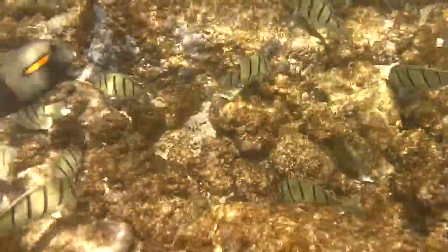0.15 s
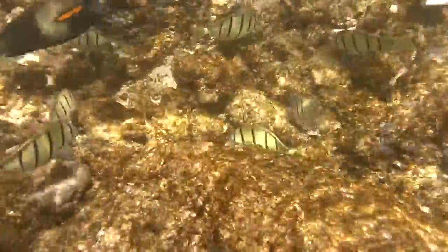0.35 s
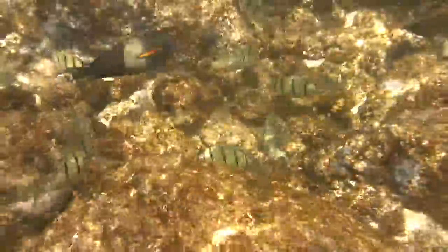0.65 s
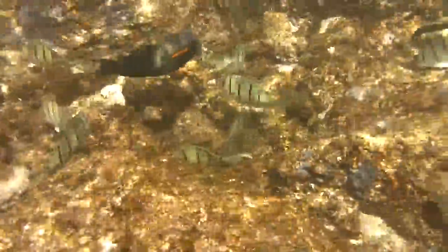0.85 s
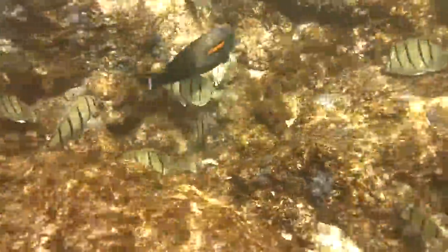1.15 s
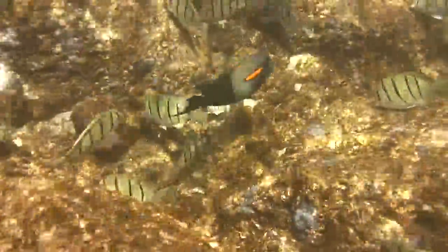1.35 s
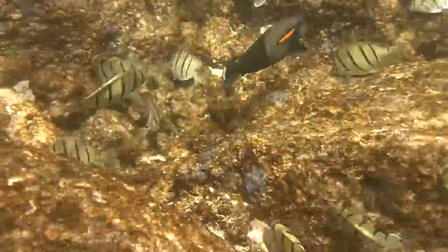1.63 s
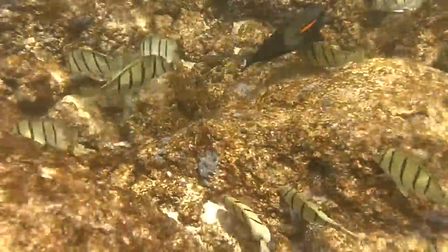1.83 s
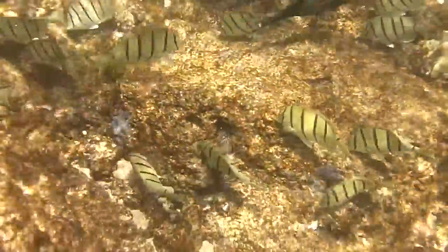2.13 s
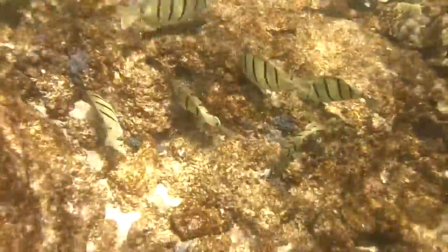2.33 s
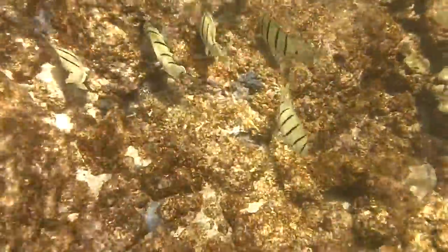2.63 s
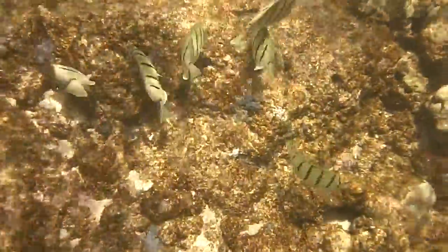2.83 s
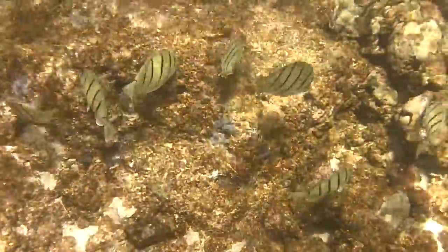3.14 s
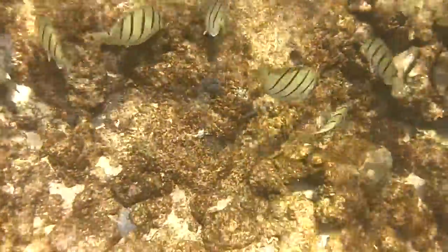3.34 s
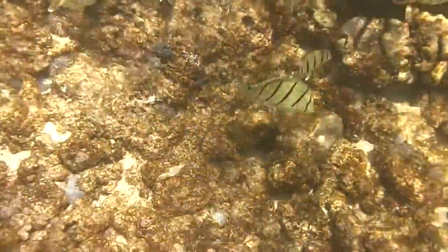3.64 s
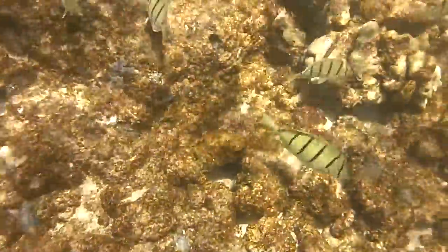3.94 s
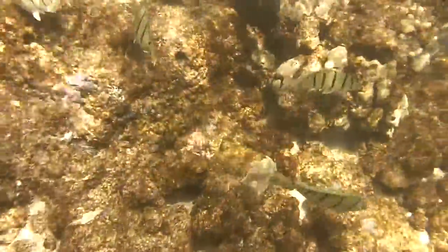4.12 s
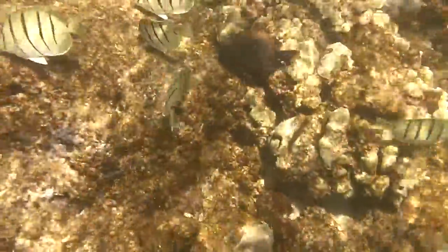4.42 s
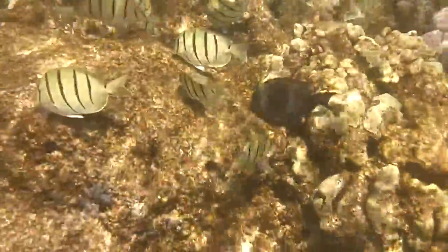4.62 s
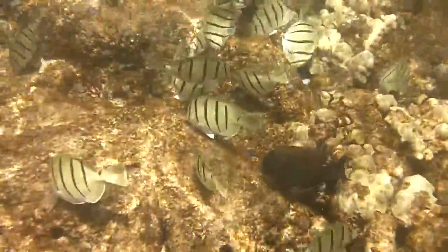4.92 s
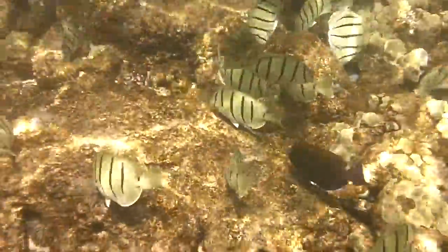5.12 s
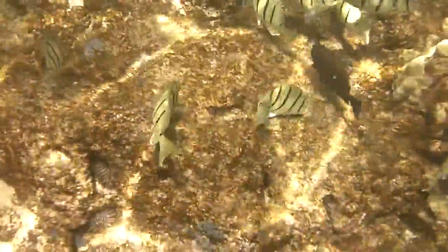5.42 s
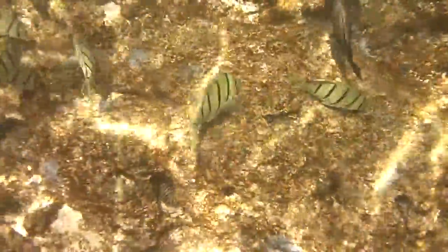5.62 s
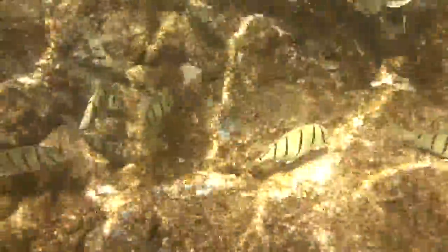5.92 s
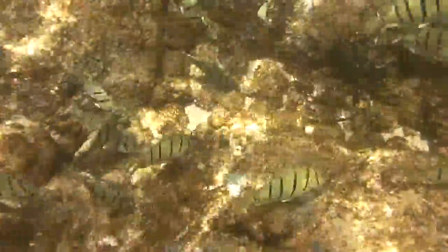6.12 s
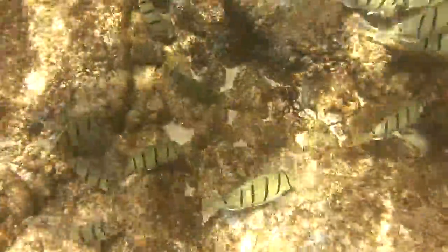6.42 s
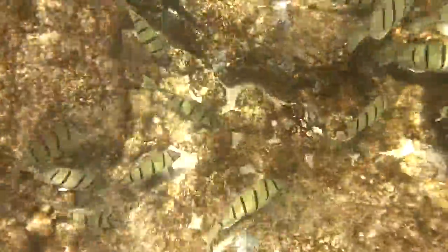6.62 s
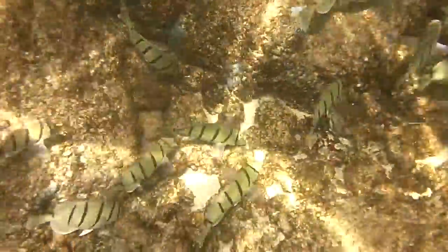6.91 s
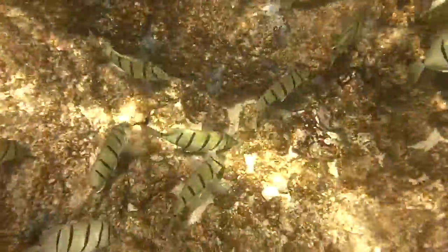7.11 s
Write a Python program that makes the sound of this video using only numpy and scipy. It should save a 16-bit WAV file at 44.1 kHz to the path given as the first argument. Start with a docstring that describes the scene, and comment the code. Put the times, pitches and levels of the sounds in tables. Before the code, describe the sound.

Underwater on a shallow reef beneath small breaking surf, with striped fish grazing silently. The sound is muffled and boxy, nearly mono, inside a sealed case. Low gurgling and a hollow trickle around one kilohertz run throughout, over deep slow swell and a faint fine shrimp crackle. From 0 to 2 s the water is lively: a broad low thump at 0.4-0.7, plopping bubbles, a cluster of bright bloops at 1.6, and small snaps. Dry stone clacks strike at 1.36 and 2.36. The surf eases around 2.4-2.9, then a dense bubbly rush churns up at 3.1 and fades by 3.4, with thumps. Afterwards softer trickling continues, with little blips around 4 and puffs of bubbles at 3.9 and 4.6. Low thumps come near 4.9-5.1 and most strongly at 5.9-6.1, with a sharp snap at 6.02. More bubbling follows at 6.3 and a low plop at 6.9, before gentle gurgling to the end near 7.3.

```python
"""A shallow reef under breaking surf, heard under water by two microphones in a sealed case.
Surf gurgles and trickles as swarms of decaying bubble resonances; near bubbles, puffs of air and
a folding wavelet add more. Shrimp snaps are decaying noise bursts, pebble clacks filtered impulses
with ringing case modes, and the swell and eddies low-frequency noise pressing on the case."""
import sys
import numpy as np
from scipy import signal
from scipy.fft import rfft, irfft, next_fast_len
from scipy.io import wavfile
from scipy.ndimage import uniform_filter1d, map_coordinates

SR = 44100
rng = np.random.default_rng(int(sys.argv[2]) if len(sys.argv) > 2 else 0)


def unload_audio(sound):
    """Save the sound as a 16-bit wav file, at the path given as the first command line argument."""
    columns = np.transpose(np.atleast_2d(sound))
    # keep every value between -1 and 1, then stretch to whole-number steps
    steps = np.round(np.clip(columns, -1, 1) * 32767)
    wavfile.write(sys.argv[1], SR, steps.astype(np.int16))


N = 320166

# strength of the surf, as the gurgle of its big bubbles before gain and flutter: t/s, level/dB
SURF_STRENGTH = [(0.0, -48), (0.28, -42), (0.55, -48.5), (0.78, -40), (1.07, -46), (1.29, -45.5),
                 (1.58, -40.5), (2.06, -45), (2.45, -53), (2.82, -56), (3.1, -43), (3.5, -44.5),
                 (3.95, -50.5), (4.35, -46), (5.1, -45), (5.9, -48.5), (6.45, -47.5), (7.26, -50)]
# spectrum of small bubbles inside the case: f/Hz, relative level/dB
TRICKLE_SPECTRUM = [(300, -65.5), (560, -25), (650, -13), (740, -13), (850, -4.5), (1030, 2.5), (1110, 0.5),
                    (1220, -4.5), (1370, -16), (1600, -18.5), (1900, -12.5), (2350, -12), (3300, -35),
                    (4500, -40), (9000, -88.5)]


def amp(db):
    """Decibels to amplitude ratio, 20 dB per factor of ten."""
    return 10 ** (np.asarray(db) / 20)


def unit(x):
    """Normalization of x to an rms of 1."""
    return x / np.sqrt(np.mean(x ** 2) + 1e-20)


def along(points, hz):
    """Linear interpolation of (f/Hz, value) points on a logarithmic frequency axis."""
    f, value = np.transpose(points)
    return np.interp(np.log(hz + 1), np.log(f + 1), value)


def curves(rows):
    """Linear interpolation in time: one value per sample for each column after t/s."""
    s, *columns = np.transpose(rows)
    return [np.interp(np.arange(N) / SR, s, column) for column in columns]


def wobble(rate):
    """Slow random modulation: a smooth spline through Gaussian knots, rate of them a second."""
    knots = rng.standard_normal(int(N * rate / SR) + 4)
    return map_coordinates(knots, [np.arange(N) * rate / SR])


def filtered(x, response):
    """Linear filtering: the spectrum of x times a complex response of frequency."""
    m = next_fast_len(N + SR // 2)
    return irfft(rfft(x, m) * response(np.fft.rfftfreq(m, 1 / SR)), m)[..., :N]


def coloured(x, level_db):
    """Minimum-phase filtering: level_db(Hz) sets the magnitude, the folded cepstrum the causal phase."""
    m = 2 * next_fast_len(len(x) // 2 + SR // 10)
    cepstrum = irfft(np.log(amp(level_db(np.fft.rfftfreq(m, 1 / SR)))))
    cepstrum[1:m // 2] *= 2
    cepstrum[m // 2 + 1:] = 0
    return irfft(rfft(x, m) * np.exp(rfft(cepstrum)), m)[:len(x)]


def through(x, spectrum):
    """Spectral shaping: x filtered by the spectrum's levels, at rms 1."""
    return unit(coloured(x, lambda hz: along(spectrum, hz)))


def add(track, s, sound):
    """Superposition: mix a sound into the track at time s."""
    part = track[max(round(s * SR), 0):][:len(sound)]
    part += sound[:len(part)]


def surge(s, hold_s, attack_s, release_s):
    """Exponential growth up to time s, a hold at 1, then exponential decay."""
    t = np.arange(N) / SR - s
    return np.exp(np.minimum(t, 0) / attack_s - np.maximum(t - hold_s, 0) / release_s)


def ring(t, hz, cycles, rise):
    """Damped resonance: a note that swells, decays over its life in cycles and may glide up as a bubble rises."""
    age = t * hz / cycles
    envelope = np.exp(-age) * (1 - np.exp(-4 * age))
    glide = 1 + rise * np.minimum(age, 4)
    return envelope * np.sin(2 * np.pi * hz * t * glide)


def froth(count, low_hz, high_hz, cycles, spread_db, blur):
    """Incoherent superposition: bubbles of random pitch and size over the noise of countless far ones."""
    when, pitch, size = rng.random((count, 3)).T
    t = np.arange(SR // 25) / SR
    hz = low_hz * (high_hz / low_hz) ** pitch
    notes = ring(t, hz[:, None], cycles, rise=0.0085)
    # exponentially distributed levels: few bubbles are loud
    notes *= amp(spread_db * np.minimum(-np.log(1 - size), 3.5))[:, None]
    index = (when * N).astype(int)[:, None] + np.arange(len(t))
    swarm = np.bincount(index.ravel(), notes.ravel(), N)[:N]
    return unit(swarm) + blur * rng.standard_normal(N)


def flow():
    """Hydrodynamic pressure: slow swell, and turbulent eddies that buffet the case over a weak current."""
    # spectra of the swell and of the eddies: f/Hz, relative level/dB
    sway_spectrum = [(3, -12), (8, 3.5), (13, 0), (22, -5), (32, -6), (50, -24), (80, -36.5), (160, -52.5),
                     (600, -110)]
    eddy_spectrum = [(20, -23), (50, 4.5), (110, 0.5), (165, -2), (215, -11), (400, -57.5), (1500, -100)]
    # eddies thumping on the case: t/s, hold/s, level/dB
    thump_times = [(0.41, 0.24, -40), (0.717, 0.071, -46), (1.127, 0.019, -42.5), (1.818, .015, -43),
                   (2.068, 0.043, -48), (3.084, .02, -42), (3.297, 0.072, -43), (4.867, 0.019, -39),
                   (5.056, 0.028, -40), (5.854, 0.049, -41.5), (5.97, .12, -36)]
    sway_db = -36.5 + 2.9 * wobble(3.09)
    sway = amp(sway_db) * through(rng.standard_normal(N), sway_spectrum)
    lumps = amp(3.9 * wobble(45))
    eddies = unit(through(rng.standard_normal(N), eddy_spectrum) * lumps)
    current = amp(-57 + 2 * wobble(9))
    thumps = [amp(db) * surge(s, hold_s, attack_s=0.041, release_s=0.056) for s, hold_s, db in thump_times]
    # current and thumps add as energies
    strength = np.linalg.norm([current, *thumps], axis=0)
    return sway + strength * eddies


def far_shrimp():
    """Multipath superposition: over a thousand tiny snaps on the reef merge into an unceasing faint crackle."""
    # spectrum inside the case: f/Hz, relative level/dB
    crackle_spectrum = [(1500, -37), (2500, -18.5), (2900, 7), (3250, 3.5), (4100, -6.5), (4950, -1),
                        (5700, -9), (6900, -8), (7600, -14), (9700, -9), (11500, -13), (15000, -14.5),
                        (15800, -32)]
    when, size = rng.random((2, 1300))
    sizes = amp(4.5 * np.minimum(-np.log(1 - size), 3.8))
    clicks = np.bincount((when * N).astype(int), sizes, N)
    t = np.arange(SR // 100) / SR
    decay = amp(-60 * t / 0.019)  # 60 dB in 19 ms
    bursts = signal.fftconvolve(clicks, decay)[:N] * rng.standard_normal(N)
    # differing paths to the case favour some bands over others from moment to moment
    z = signal.stft(bursts, nperseg=128)[2]
    paths = uniform_filter1d(rng.standard_normal(z.shape), 6, 0)  # smooth in frequency
    paths = uniform_filter1d(paths, 8, 1)  # smooth in time
    bursts = signal.istft(z * amp(4.94 * unit(paths)), nperseg=128)[1][:N]
    crackle = unit(bursts) + 0.76 * rng.standard_normal(N)
    return amp(-67.5) * through(crackle, crackle_spectrum)


def near_shrimp():
    """Cavitation: each collapsing cavity cracks, smeared over milliseconds by the rocks and the case."""
    # loudest snaps: t/s, level before a common gain/dB, centre of tilt f/Hz, fall-off to either side/(dB/octave)
    loud_snaps = [(.4426, -59, 11900, 10), (.4968, -48, 4570, 12), (.52, -54.5, 7000, -4),
                  (.849, -49.5, 7000, 5), (.9236, -54, 7000, -1), (1.8648, -46, 2800, 14.5),
                  (1.9009, -49.5, 3450, 5.5), (2.0609, -50.5, 5000, 4), (2.4488, -56, 4500, 4),
                  (2.8349, -59.5, 9000, 9), (2.9157, -62, 13000, 8), (3.728, -55.5, 5030, 6.5),
                  (3.8955, -48, 3250, 4), (4.339, -48.5, 4830, -2), (5.6475, -56, 7000, 0),
                  (6.02, -43, 5130, 4), (6.262, -58, 10200, 13), (6.3337, -52, 6360, 4),
                  (6.6477, -52.5, 7000, 4.5), (6.7503, -51, 5100, 8.5)]
    # spectrum before the tilt: f/Hz, relative level/dB
    snap_spectrum = [(500, -24), (1100, -53), (1600, -17), (2300, 12.5), (3300, -4), (4100, -8.5),
                     (4950, -1), (5800, -7), (7000, -7.5), (8000, -14.5), (9600, -3), (11500, -10),
                     (15000, -16)]
    track, t = np.zeros(N), np.arange(SR // 20) / SR
    dull_hz, bright_hz = 5000, 12900  # range of the weak snaps' centres
    strays = [(when * N / SR, -60.5 + 4 * (2 * size - 1), dull_hz * (bright_hz / dull_hz) ** colour, 3.5)
              for when, size, colour in rng.random(size=(11, 3))]
    for s, db, centre_hz, falloff_db in [*loud_snaps, *strays]:
        burst = rng.standard_normal(len(t)) * amp(-60 * t / .009)  # 60 dB in 9 ms
        burst[0] += 5  # the direct crack

        def snap_db(hz):
            octaves = np.abs(np.log2((hz + 100) / centre_hz))
            return along(snap_spectrum, hz) - falloff_db * octaves

        add(track, s, amp(db - 7.5) * unit(coloured(burst, snap_db)))
    return track


def pebbles():
    """Impact excitation: loose stones rolled by the surge knock and rebound, and the case rings briefly."""
    # knocks: t/s, peak level without the case ring/dB, dull above f/Hz, delay of rebound/s
    knocks = [(1.36, -17, 3500, .00092), (2.356, -15.5, 9500, 0.002)]
    # spectrum of a knock: f/Hz, relative level/dB
    knock_spectrum = [(300, -37), (800, -5), (1050, -1), (1400, 4), (2200, 5), (2700, 4), (3300, -17),
                      (4100, -14), (4900, -10.5), (5700, -42), (7000, -14.5), (8500, -25), (15000, -24)]
    # notes that a knock sets ringing in the case: f/Hz, life/cycles, level/dB
    case_modes = [(1066, 3.5, -20.5), (2200, 9.4, -32), (3120, 4.4, -29)]
    track, t = np.zeros(N), np.arange(SR // 20) / SR
    case = sum(amp(db) * ring(t, hz, cycles, rise=0) for hz, cycles, db in case_modes)
    for s, db, dull_hz, rebound_s in knocks:
        contacts = np.zeros(len(t))
        contacts[0] = 1
        add(contacts, rebound_s, np.array([.4]))

        def knock_db(hz):
            return along(knock_spectrum, hz) - 10 * np.log10(1 + (hz / dull_hz) ** 20)

        clack = coloured(contacts, knock_db)
        add(track, s, amp(db) * clack / np.abs(clack).max() + case)
    return track


def wavelet():
    """Air entrainment: a small wave folds over at the surface and churns a dense cloud of bubbles."""
    # spectrum inside the case: f/Hz, relative level/dB
    wavelet_spectrum = [(30, -18), (65, -17), (150, -13), (260, -8.5), (400, -1.5), (500, 2.5),
                        (590, -12.5), (760, -12), (1080, 2), (1400, -22), (1800, -14.5), (2300, -19.5),
                        (3000, -29), (4000, -47), (6000, -42.5), (14000, -76)]
    fold = surge(3.08, hold_s=0.11, attack_s=0.027, release_s=0.065)
    cloud = froth(count=2500, low_hz=130, high_hz=7200, cycles=0.61, spread_db=4, blur=2.4)
    level_db = -31 + 1.1 * wobble(33)
    return fold * amp(level_db) * through(cloud, wavelet_spectrum)


def puffs():
    """Bubble break-up: pockets of air tear loose and bubble for a moment, coarser than the trickle."""
    # puffs: t/s, hold/s, level/dB
    puff_times = [(0.697, 0.34, -48.5), (1.858, 0.22, -50), (3.916, 0.21, -50.5), (4.62, 0.22, -48),
                  (6.258, 0.31, -49.5)]
    cloud = froth(count=1300, low_hz=603, high_hz=2740, cycles=5.6, spread_db=4.5, blur=.3)
    envelope = sum(amp(db) * surge(s, hold_s, attack_s=0.025, release_s=.05) for s, hold_s, db in puff_times)
    return through(cloud, TRICKLE_SPECTRUM) * envelope


def near_bubbles():
    """Bubble resonance: single damped notes close to the case, the weak ones more often in stronger surf."""
    # loudest bubbles: t/s, peak level before a common gain/dB, initial f/Hz, life/cycles
    loud_bubbles = [(.046, -26.5, 350, 1.3), (.247, -28.5, 264, 3), (.2956, -27.5, 433, 6.9),
                    (.388, -31, 1020, 2.2), (.429, -24, 2370, 2.6), (.442, -25.5, 411, 4.2),
                    (.7136, -26, 353, 2.4), (.7917, -26, 243, 1.14), (.984, -36, 2000, 5),
                    (1.0953, -22, 349, 3), (1.3936, -30, 1110, 7.7), (1.563, -23.5, 435, 10.7),
                    (1.6299, -24.5, 650, 6), (1.6305, -19.5, 860, 1.2), (1.65, -21, 1110, 3.3),
                    (1.9214, -22, 427, 3.5), (2.04, -32, 1120, 3.1), (2.057, -18.5, 338, 0.39),
                    (2.1204, -29, 454, 10.6), (2.398, -33.5, 254, 2.3), (2.721, -37.5, 1320, 7.4),
                    (2.795, -34.5, 1150, 4), (2.908, -33.5, 980, 6.1), (3.362, -25.5, 354, 3.8),
                    (3.574, -32, 1055, 4), (3.924, -33, 1296, 3.2), (3.986, -36.5, 2240, 6.3),
                    (4.033, -30, 503, 2), (4.042, -31, 273, 0.81), (4.054, -33.5, 1980, 7.4),
                    (4.118, -39, 640, 4), (4.118, -41, 1510, 8.9), (4.2022, -30, 403, 2.7),
                    (4.208, -34, 284, 3.6), (4.512, -34.5, 1750, 4.6), (4.718, -38, 990, 3.6),
                    (4.866, -26, 463, 5.6), (5.6636, -26, 1016, 4.2), (5.721, -39, 2130, 12),
                    (5.9691, -25.5, 1110, 3.1), (6.267, -28, 1007, 4.5), (6.323, -32, 1028, 9.5),
                    (6.35, -35.5, 710, 6.5), (6.565, -28, 2350, 1.8), (6.64, -37, 2070, 2.5),
                    (6.905, -26.5, 920, 8), (6.9076, -23, 376, 2), (7.187, -36, 1180, 5.6)]
    track, t = np.zeros(N), np.arange(SR // 10) / SR
    when, pitch, life = rng.random(size=(18, 3)).T
    # the running total of surf strength maps even draws to times
    churned = np.cumsum(amp(curves(SURF_STRENGTH)[0] / 2))
    stray_s = np.searchsorted(churned, when * churned[-1]) / SR
    low_hz, high_hz = 715, 2610
    stray_hz = low_hz * (high_hz / low_hz) ** pitch
    # weak bubbles partly follow the trickle's spectrum
    stray_db = -38 + 0.37 * along(TRICKLE_SPECTRUM, stray_hz)
    stray_cycles = 5.2 * (.5 + life)
    strays = zip(stray_s, stray_db, stray_hz, stray_cycles)
    for s, db, hz, cycles in [*loud_bubbles, *strays]:
        note = ring(t, hz, cycles, rise=0.001)
        add(track, s, amp(db - 2.5) * note / np.abs(note).max())
    return track


def surf():
    """Collective bubble noise: big bubbles gurgle and small ones trickle in spurts, following the surf less."""
    # spectrum of big bubbles inside the case: f/Hz, relative level/dB
    gurgle_spectrum = [(60, -45), (150, -18), (220, -14.5), (300, -10), (390, -0.5), (460, 2.5), (505, -8),
                       (555, -26), (600, -23), (645, -14), (730, -26), (900, -63), (3000, -100)]
    gurgle_db, = curves(SURF_STRENGTH)
    # small bubbles gain 0.52 dB per dB of surf
    trickle_db = -47.5 + 0.52 * (gurgle_db - gurgle_db.mean())
    spurt = wobble(14)  # shared by both sizes
    big = froth(count=2000, low_hz=173.6, high_hz=690.0, cycles=2.43, spread_db=4.0, blur=3.54)
    small = froth(count=3000, low_hz=659.0, high_hz=3460, cycles=5.55, spread_db=3.0, blur=3.14)
    gurgle = through(big, gurgle_spectrum) * amp(gurgle_db + 2.5 + 0.55 * spurt + 0.77 * wobble(25))
    trickle = through(small, TRICKLE_SPECTRUM) * amp(trickle_db + 1.03 * spurt)
    return gurgle + trickle


def scene():
    """Interaural-style delay: water sounds reach the left microphone later; flow presses on both at once."""
    water = far_shrimp() + near_shrimp() + pebbles() + wavelet() + puffs() + near_bubbles() + surf()
    lag_s = 2.1e-5
    side = np.array([[-1], [1]])  # left half a lag late, right half a lag early
    pair = filtered(water, lambda hz: np.exp(1j * np.pi * hz * lag_s * side))
    hiss = amp(-81) * rng.standard_normal((2, N))  # each microphone's own
    return pair + flow() + hiss


def record(dry):
    """Band rejection and band limiting: the case blocks narrow bands, and nothing passes above 15.8 kHz."""
    # bands that the case blocks: centre f/Hz, width/Hz
    blocked_bands = [(2713, 844), (5512, 420), (7903, 540), (10939, 980)]

    def response(hz):
        notches = [(c * c - hz * hz) / (c * c - hz * hz + 1j * hz * width) for c, width in blocked_bands]
        return np.prod(notches, axis=0) * (hz < 15800)

    return filtered(dry, response)


dry = scene()
out = record(dry)
unload_audio(out)
```